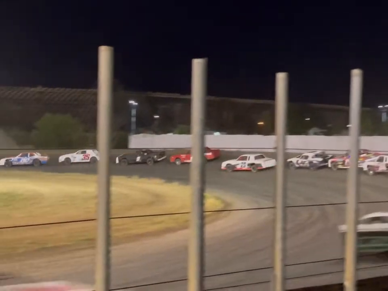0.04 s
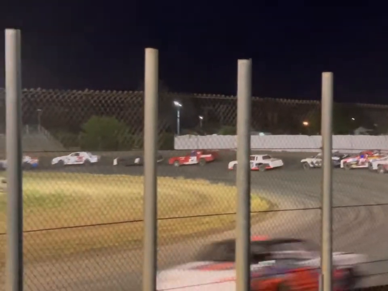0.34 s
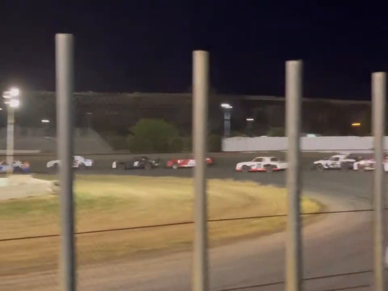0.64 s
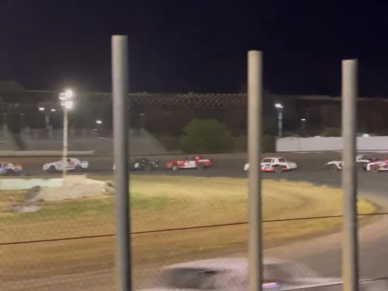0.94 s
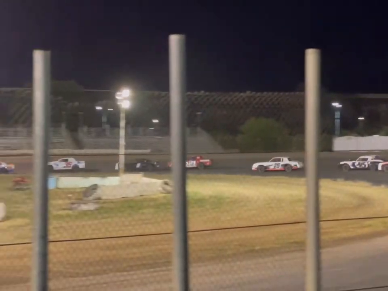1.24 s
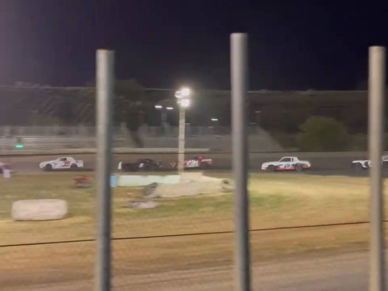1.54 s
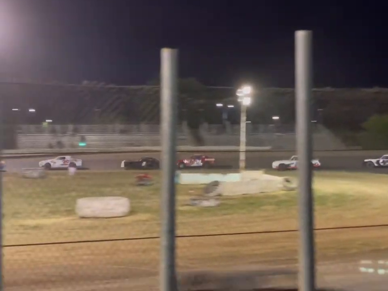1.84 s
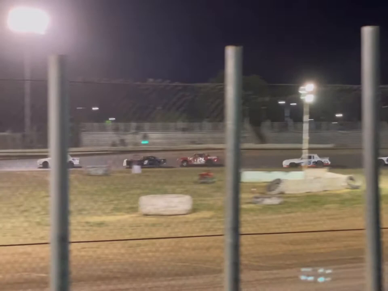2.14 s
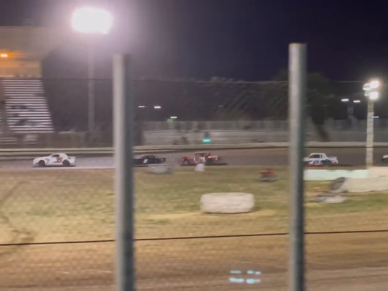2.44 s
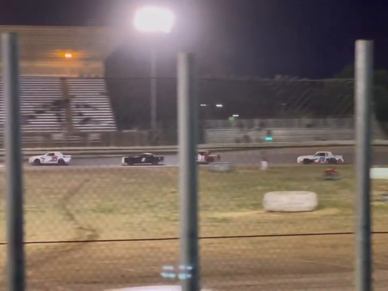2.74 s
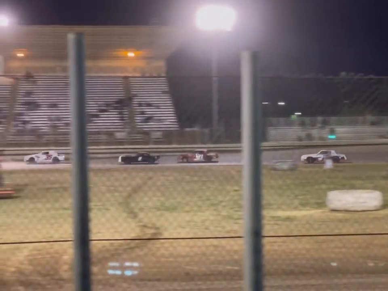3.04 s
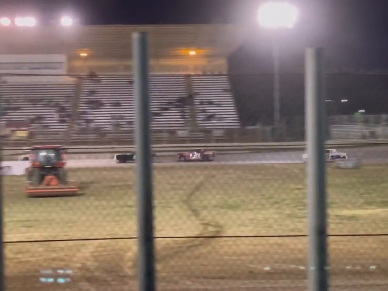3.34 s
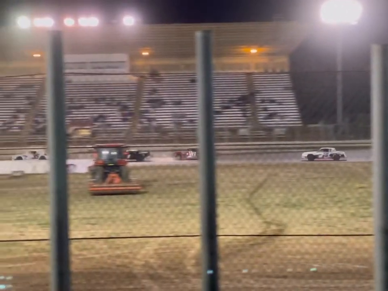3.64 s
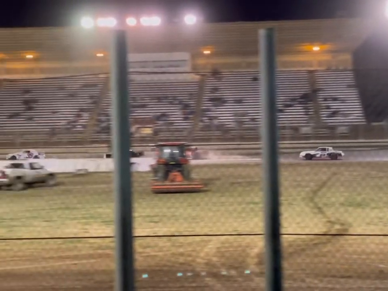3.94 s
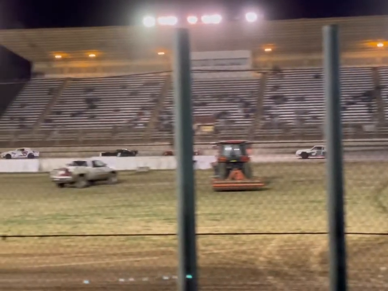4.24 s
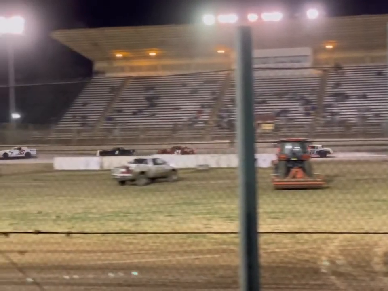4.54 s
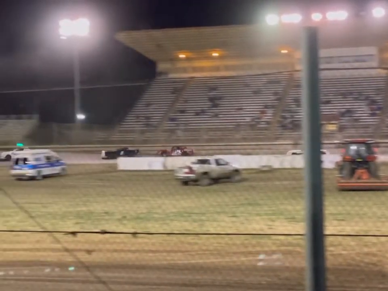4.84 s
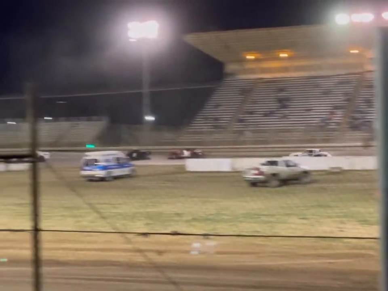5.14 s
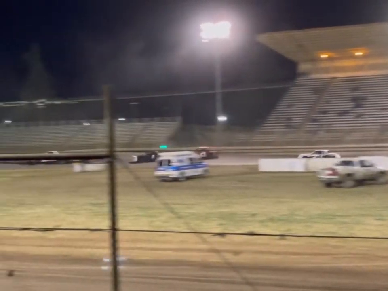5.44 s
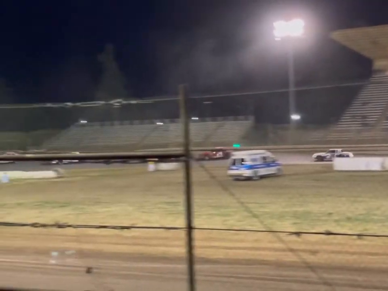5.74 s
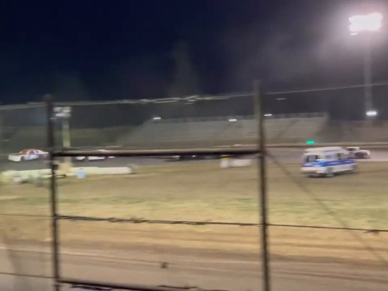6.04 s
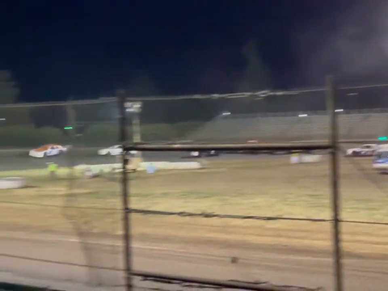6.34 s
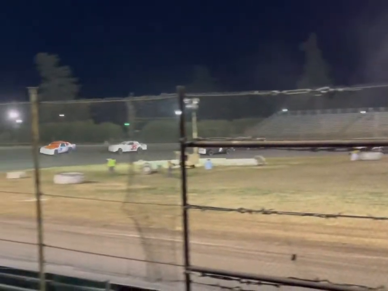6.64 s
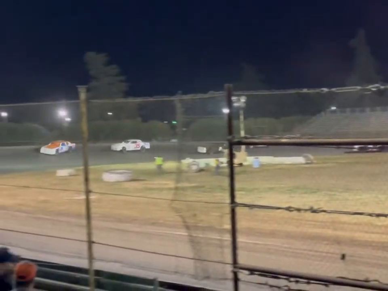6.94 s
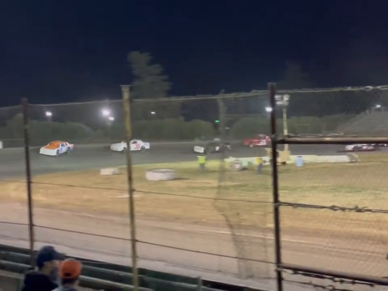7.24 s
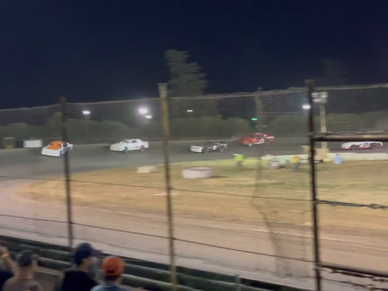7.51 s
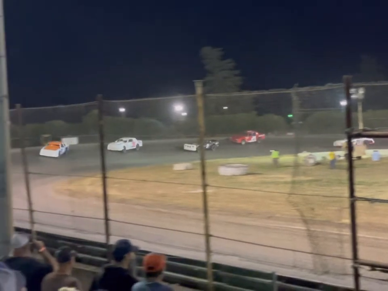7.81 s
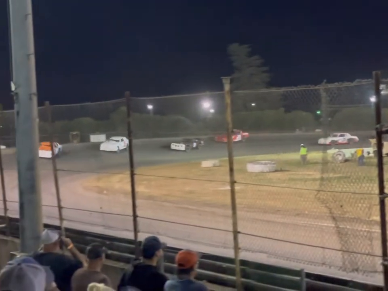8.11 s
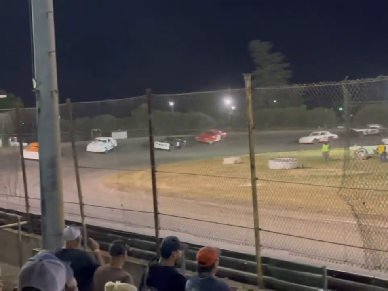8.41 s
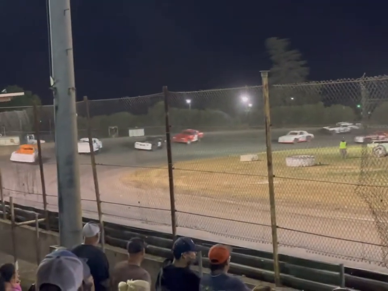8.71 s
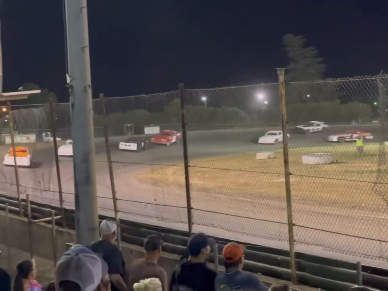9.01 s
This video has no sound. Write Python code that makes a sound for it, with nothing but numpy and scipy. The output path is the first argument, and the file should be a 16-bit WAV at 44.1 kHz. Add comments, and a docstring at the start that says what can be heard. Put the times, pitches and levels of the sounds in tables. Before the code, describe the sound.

A pack of race cars roars around a dirt oval, with loud droning engines and exhaust crackles, heard from the stands.

```python
"""V8 stock cars lap a dirt oval, heard from the grandstand.
First the last cars speed up past the fence, throwing up hissing dirt; one leaky exhaust pops, and unburnt
fuel cracks in it. From about 3 s the pack drones along the far straight, its firing pulses blurred into a
roar by echoes from the stands. Single engines hum above it, and two more exhausts pop from 5 to 7 s.
Then the pack comes round the turn towards the listener and grows louder again."""
import sys
import numpy as np
from scipy import signal
from scipy.fft import rfft, irfft, next_fast_len
from scipy.io import wavfile
from scipy.ndimage import uniform_filter1d

SR = 44100
rng = np.random.default_rng(int(sys.argv[2]) if len(sys.argv) > 2 else 0)


def unload_audio(sound):
    """Save the sound as a 16-bit wav file, at the path given as the first command line argument."""
    columns = np.transpose(np.atleast_2d(sound))
    # keep every value between -1 and 1, then stretch to whole-number steps
    steps = np.round(np.clip(columns, -1, 1) * 32767)
    wavfile.write(sys.argv[1], SR, steps.astype(np.int16))


N = 408807
TIME = np.arange(N) / SR

# Stretches of engine sound that hum and rasp: t/s, engine cycle rate/Hz (8 firings a cycle), level/dB
NEAR_RUN = [(0.0, 32.68, -14), (0.15, 33.93, -15.5), (0.3, 34.08, -15.5), (0.55, 35.24, -26)]
FIRST_RUN = [(0.2, 33.73, -20), (0.5, 34.94, -14.5), (0.8, 35.7, -15), (1.2, 36.95, -15.5),
             (1.55, 38.0, -21), (1.9, 39.83, -19.5), (2.3, 41.55, -23), (2.6, 41.84, -24.5)]
CRACKLER_RUN = [(0.6, 30.1, -27), (0.85, 31.5, -20.5), (1.1, 33.95, -19), (1.4, 35.63, -15),
                (1.6, 36.04, -14), (1.8, 36.4, -16), (2.0, 37.67, -23), (2.2, 40, -21.5), (2.5, 41.34, -31)]
SPRINTER_RUN = [(3.0, 44.22, -25), (3.25, 44.8, -32), (3.6, 45.98, -29), (4.05, 47.2, -24.5),
                (4.3, 46.43, -36), (4.6, 47.3, -27), (4.85, 47.56, -27.5), (5.05, 46.56, -28.5),
                (5.5, 48.12, -23.5), (5.7, 48.3, -26.5), (5.9, 49.76, -41)]
LEADER_RUN = [(5.6, 35.45, -34), (6.0, 36.7, -29), (6.25, 37.45, -24.5), (6.8, 38.05, -30.5),
              (7.3, 39.35, -24.5), (7.65, 40.55, -29.5), (7.9, 40.75, -22), (8.2, 42.0, -22.5),
              (8.5, 42.7, -23.5), (8.9, 43.7, -21.5), (9.27, 44.6, -24.5)]


def gain_of(db):
    """Turns decibels into a factor to multiply by."""
    return 10 ** (np.asarray(db) / 20)


def evened(x):
    """Scales a signal to an average strength (rms) of 1."""
    return x / np.sqrt(np.mean(x ** 2) + 1e-20)


def read(points, hz):
    """Looks up a table between its rows, on a log-frequency axis."""
    f, value = np.transpose(points)
    return np.interp(np.log(hz + 1), np.log(f + 1), value)


def filtered(x, response):
    """Filters x by a gain given as a function of frequency."""
    size = next_fast_len(len(x) + 2048)
    return irfft(rfft(x, size) * response(np.fft.rfftfreq(size, 1 / SR)), size)[:len(x)]


def wander(t, per_s):
    """A smooth random wobble of size about 1, with per_s new values a second."""
    knots = signal.resample_poly(rng.standard_normal(800), 8, 1)
    return np.interp(t * per_s * 8, np.arange(len(knots)), knots)


def humps(rows, t=TIME):
    """Level in dB of smooth swells or dips."""
    return sum(db * np.cos(np.pi * np.clip((t - middle) / length, -.5, .5)) ** 2
               for middle, length, db in rows)


def snaps(rows, colour, level_db, decay_s, scatter):
    """Each snap is a sudden jump in pressure with a short puff of noise behind it."""
    out, t = np.zeros(N), np.arange(512) / SR
    for s, db, treble_db in rows:
        snap = scatter * rng.standard_normal(len(t)) * np.exp(-t / decay_s) + (t == 0)
        snap = filtered(np.pad(snap, 64),
                        lambda f: gain_of(read(colour, f) + treble_db * np.clip(f / 6000 - .6, 0, 1)))
        part = out[round(s * SR) - 64:][:len(snap)]
        part += gain_of(db + level_db) * snap[:len(part)] / abs(snap).max()
    return out


def seat_ticks():
    """Faint, bright ticks near the seats."""
    # t/s, relative peak/dB, extra treble/dB
    ticks = [(4.996, -38, 12), (5.01, -38, 4), (5.354, -34, -5), (6.3212, -36, 0), (7.3502, -33, -3),
             (7.646, -29, -7)]
    # tone of a tick: f/Hz, level/dB
    colour = [(2000, -21), (5000, -10), (7200, 10), (10000, -2), (14000, -38)]
    return snaps(ticks, colour, level_db=5.0, decay_s=.002, scatter=0.71)


def stands(x):
    """Echoes off the stands, treble dying first; the cars move, so three sets of paths take turns."""
    # f/Hz, time to fade by 60 dB/s
    echo_times = [(100, 2.6), (500, 0.9), (2000, 0.99), (8000, 0.44)]
    echoes = rng.standard_normal((3, SR)) * (rng.random((3, SR)) < 2000 / SR)  # about 2000 a second
    hz, t, spectrum = signal.stft(echoes, SR, nperseg=256)
    decay = gain_of(-60 * t / read(echo_times, hz)[:, None])
    tails = signal.istft(spectrum * decay, SR, nperseg=256)[1]
    turn = 2 * np.pi * (.4 * TIME + np.arange(3)[:, None] / 3)
    return signal.oaconvolve(x * np.cos(turn), tails, axes=1)[:, :N].sum(0)


def firings(cycle_hz, uneven, misfire):
    """One pulse per firing, the eight cylinders unequal; the revs climb, sag and wobble."""
    stroke = np.arange(int(9 * cycle_hz * N / SR))
    t = stroke / (8 * cycle_hz)
    revs = .07 * np.sin(2 * np.pi * (t / 7 + rng.random())) + .015 * wander(t, 1.6) + .006 * wander(t, 12)
    at_sample = np.cumsum(SR / (8 * cycle_hz * (1 + revs))).astype(int)
    cylinder = evened(signal.detrend(rng.standard_normal(8), type="constant"))
    chance = rng.standard_normal(6000)
    force = (.35 + uneven * cylinder[stroke % 8] + misfire * chance[stroke]) * gain_of(2 * wander(t, 1.5))
    return np.bincount(at_sample, force, N)[:N]


def throttle(rise_s=0.11, cut_s=0.086):
    """Bursts of throttle with the pipes pointing this way: each builds, holds and stops."""
    # foot down/s, foot up/s, relative level/dB
    bursts = [(2.976, 3.29, 4), (4.5, 4.802, 1), (5.25, 5.687, 5.5), (6.027, 6.4, 4), (6.47, 6.625, 5),
              (7.098, 7.453, 2), (7.793, 8.137, 4), (8.85, 9.2, 1)]
    return sum(db * np.clip((TIME - down) / rise_s, 0, 1) * np.clip(1 - (TIME - up) / cut_s, 0, 1)
               for down, up, db in bursts)


def pack_gain(db, closeness_share, burst_share):
    """Loudness of one band of the pack's sound, following distance and throttle."""
    # the pack leaves the fence, runs the far straight and returns: t/s, relative level/dB
    closeness = [(0, -5.5), (.8, 0), (1.85, -1), (2.75, -6), (4.2, -10.5), (7, -10.5), (7.6, -7),
                 (8.55, -6.5), (8.95, -4.5), (9.27, -3.5)]
    closeness_db = np.interp(TIME, *np.transpose(closeness))
    return gain_of(db + closeness_share * closeness_db + burst_share * throttle())


def passing(nearest_s, crossing_s, db, falloff_db):
    """Loudness of something that goes by in a straight line."""
    return gain_of(db - falloff_db * np.log10(np.hypot(1, (TIME - nearest_s) / crossing_s)))


def roar_band(x, lo_hz, hi_hz):
    """One band of the exhaust roar, held steady: so many engines together keep an even level."""
    # tone of the roar: f/Hz, level/dB
    colour = [(25, -32), (39, -31), (50, -3.5), (72, -0.5), (108, -5.5), (152, -8.5), (195, 1), (235, 3),
              (340, -6), (460, -12.5), (750, -11.5), (1050, -17.5), (1500, -25.5), (2900, -25.5),
              (5500, -38.5), (10000, -38.5)]
    band = filtered(x, lambda f: gain_of(read(colour, f))
                    / np.sqrt((1 + (f / hi_hz) ** 12) * (1 + (lo_hz / (f + 1)) ** 12)))
    return band / np.sqrt(abs(uniform_filter1d(band ** 2, size=SR // 4)) + 1e-20)


def dirt_spray(gas):
    """Dirt is thrown up unevenly and hisses; a little exhaust noise is mixed in."""
    # tone of the hiss: f/Hz, level/dB
    colour = [(6000, -14), (8000, 3.5), (10000, 5.5), (12000, 1), (14000, 0.5), (15500, -9)]
    spatter = gain_of(wander(TIME, per_s=7))
    hiss = filtered(.3 * gas + rng.standard_normal(N), lambda f: gain_of(read(colour, f)) * (f > 5000))
    return evened(hiss) * spatter


def pack(puff_s=0.00077):
    """Ten engines at once: firing pulses, mostly heard as echoes, with puffs of gas and flying dirt."""
    # bands from low to high: base level/dB, share of closeness, share of throttle
    rumble = (-33, 0.027, -0.18)
    boom = (-23, 0.055, .05)
    bark = (-24, 0.5, 0.37)
    buzz = (-28.5, 0.92, 0.75)
    fizz = (-80, .68, .2)
    # the last cars pass the fence: nearest at t/s, time to drive their distance from the seats/s,
    # level/dB, loss per tenfold distance/dB
    rumble_pass = (0, 0.9, -21, 37)
    boom_pass = (-0.65, 0.5, -18.5, 28.5)
    spray_pass = (1.39, 0.75, -39, 46.5)
    # the boom swells and dips as engines fall in and out of step: middle/s, length/s, gain/dB
    swells = [(.12, 0.7, 2), (1.75, 1, 2), (2.45, 0.21, -4.5), (2.62, 0.17, -7), (3.12, 0.14, 2),
              (4.87, 0.87, 3.5), (5.36, 0.2, 6), (6.15, 0.5, 1), (7.9, 0.11, 3.5), (8.26, 0.13, 4),
              (8.8, 0.86, -0.5)]
    pulses = evened(sum(firings(hz, uneven=1.39, misfire=0.82) for hz in np.linspace(36, 51, num=10)))
    puff_power = signal.lfilter([1], [1, -np.exp(-1 / (puff_s * SR))], abs(pulses))
    gas = evened(np.sqrt(puff_power) * rng.standard_normal(N))
    echoes = evened(stands(pulses))
    low = echoes + 0.31 * pulses + .5 * gas
    high = echoes + 0.27 * pulses + gas
    flutter = gain_of(.5 * wander(TIME, per_s=17))  # moving air makes the treble flutter
    boom_gain = np.hypot(pack_gain(*boom), passing(*boom_pass)) * gain_of(humps(swells))
    return (roar_band(low, 20, 145) * np.hypot(pack_gain(*rumble), passing(*rumble_pass))
            + roar_band(low, 124, 398) * boom_gain
            + roar_band(low, 392, 1500) * pack_gain(*bark)
            + roar_band(high, 1323, 7620) * pack_gain(*buzz) * flutter
            + dirt_spray(gas) * np.hypot(pack_gain(*fizz), passing(*spray_pass)) * flutter)


def pipe(x, centre_hz, width):
    """An open exhaust pipe favours a broad range of pitches around centre_hz."""
    return filtered(x, lambda f: np.exp(-(np.log((f + 1) / centre_hz) / width) ** 2 / 2))


def rasp(run, level_db, sharpness, centre_hz, width=0.8):
    """Gas tears out of a pipe at each firing; much of it repeats every cycle, giving overtones."""
    s, cycle_hz, run_db = np.transpose(run)
    cycles = np.cumsum(np.interp(TIME, s, cycle_hz)) / SR
    puffs = np.exp(-sharpness * (cycles * 8 % 1))
    repeating = np.interp(cycles % 1, np.linspace(0, 1, 1200), rng.standard_normal(1200))
    gas = pipe(puffs * (repeating + .5 * rng.standard_normal(N)), centre_hz, width)
    return evened(gas) * gain_of(level_db + np.interp(TIME, s, run_db, left=-120, right=-120))


def exhaust_rasps():
    """Five stretches of engine sound have a rough edge of rushing gas."""
    return (rasp(NEAR_RUN, level_db=-19.5, sharpness=0.92, centre_hz=2320)
            + rasp(FIRST_RUN, level_db=-17.5, sharpness=1.0, centre_hz=2900, width=0.62)
            + rasp(CRACKLER_RUN, level_db=-14, sharpness=3.2, centre_hz=1700)
            + rasp(LEADER_RUN, level_db=-14.5, sharpness=2.0, centre_hz=1270)
            + rasp(SPRINTER_RUN, level_db=-25, sharpness=2.5, centre_hz=1800))


def pops(run, level_db, centre_hz, decay_s, width=0.45):
    """One sharp puff in every engine cycle, no two equally strong."""
    s, cycle_hz, run_db = np.transpose(run)
    speed = np.interp(TIME, s, cycle_hz)
    cycles = np.cumsum(speed * (TIME >= s[0])) / SR
    force = gain_of(2 * rng.standard_normal(500))[cycles.astype(int)]
    puffs = force * np.exp(-(cycles % 1) / speed / decay_s) * (cycles > 0) * rng.standard_normal(N)
    loudness = gain_of(level_db + np.interp(TIME, s, run_db, left=-120, right=-120))
    return pipe(puffs, centre_hz, width) * loudness


def exhaust_leaks():
    """Three leaking exhausts pop, one after another."""
    # t/s, engine cycle rate/Hz, relative level/dB
    crackler = [(1.3212, 35.9, -12), (1.6, 35.97, 0), (1.75, 36.3, 0), (1.85, 36.8, 0), (1.9, 37.15, -2),
                (2.06, 37.6, -12)]
    sprinter = [(5.35, 47.7, -8), (5.5, 48, 0), (5.68, 48.35, 0), (5.76, 48.7, -8)]
    blarer = [(6.02, 45.8, -6), (6.15, 46.5, 0), (6.35, 46, 0), (6.65, 45.2, -8)]
    return (pops(crackler, level_db=-9.5, centre_hz=3700, decay_s=0.00098)
            + pops(sprinter, level_db=-15.5, centre_hz=1980, decay_s=0.0013)
            + pops(blarer, level_db=-16, centre_hz=1580, decay_s=0.0027, width=0.68))


def fuel_cracks():
    """Unburnt fuel goes off in the crackling car's exhaust."""
    # t/s, relative peak/dB, extra treble/dB
    cracks = [(1.544, -8.5, 2), (1.655, -10, 0), (1.7103, -8.5, -7), (1.7655, -14, -2), (1.793, -9, -5),
              (1.8203, -8, 4), (1.8477, -9, 1), (1.8747, -7, 2), (1.9016, -10, 0), (1.9285, -7, 2),
              (2.0087, -11, 4)]
    # tone of a crack: f/Hz, level/dB
    colour = [(500, -14), (1500, -7), (3000, 17.5), (4800, 11), (6500, -2.5), (9000, -5), (13500, -3),
              (16000, -10)]
    return snaps(cracks, colour, level_db=4.0, decay_s=0.00063, scatter=0.18)


def car(run, tones, weak_db, fade_db, flares=(), jitter=0.00184, fades_per_s=7, knee_hz=635,
        path_radians=0.48):
    """An engine hums at multiples of its cycle rate; each tone fades by itself as echo paths shift."""
    s, cycle_hz, level_db = np.transpose(run)
    step = 6  # work on every sixth sample, fill in the rest at the end
    t = np.arange(max(s[0], 0), min(s[-1], N / SR), step / SR)
    speed = np.interp(t, s, cycle_hz) * (1 + jitter * wander(t, 14))
    cycles = np.cumsum(speed) * step / SR
    strong = {round(k): db for k, db in tones}
    sound = 0
    for k in range(2, 62):
        # unlisted tones start from weak_db and fall away above knee_hz
        db = strong.get(k, weak_db - 10 * np.log10(1 + (k * cycle_hz.mean() / knee_hz) ** 3))
        db = db + humps([row[1:] for row in flares if round(row[0]) == k], t)
        fade = .8 if k in strong else 1  # the leading tones hold firmer
        phase = 2 * np.pi * rng.random() + fade * path_radians * wander(t, fades_per_s)
        strength = gain_of(db + fade * fade_db * wander(t, fades_per_s))
        sound = sound + strength * np.cos(2 * np.pi * k * cycles + phase)
    sound = signal.resample_poly(evened(sound) * gain_of(np.interp(t, s, level_db)), step, 1)
    return np.interp(TIME, t[0] + np.arange(len(sound)) / SR, sound, left=0, right=0)


def single_cars():
    """Twelve stretches of engine hum; a car's tone changes as it moves round the track."""
    # t/s, engine cycle rate/Hz, level/dB
    droner_run = [(2.25, 40.5, -34), (2.48, 41.2, -28), (2.56, 41.2, -17), (2.75, 40.8, -18),
                  (2.97, 40.1, -21), (3.2, 41.35, -22), (3.5, 40.15, -24.5), (3.85, 39.15, -27),
                  (4.05, 39.5, -26), (4.28, 38.2, -27), (4.45, 38.85, -26.5), (4.75, 38.35, -25.5),
                  (5.0, 36.9, -28), (5.22, 35.25, -27), (5.5, 36.3, -36)]
    far_run = [(2.35, 41.7, -26), (2.6, 41.9, -39), (3.0, 40.45, -33), (3.5, 37.76, -39), (4.0, 37.65, -36),
               (4.35, 37.28, -28.5), (4.7, 35.93, -34)]
    lifter_run = [(4.7, 44.3, -38), (4.9, 43.26, -29), (5.05, 41.2, -31), (5.25, 37.7, -25.5),
                  (5.4, 37, -41)]
    chaser_run = [(5.4, 39.0, -37), (5.8, 40.17, -23), (6.2, 42.34, -24), (6.6, 44.33, -25),
                  (6.85, 45.25, -36), (7.05, 45.1, -27.5), (7.45, 47.7, -27), (7.75, 47.34, -24),
                  (8.05, 48.6, -28), (8.3, 48.5, -25.5), (8.6, 49.45, -28), (9.27, 49.63, -25)]
    blarer_run = [(6.0, 45.84, -37), (6.15, 46.4, -23.5), (6.3, 46.3, -24.5), (6.42, 45.46, -32),
                  (6.55, 45.7, -32)]
    third_run = [(6.4, 39.8, -37), (6.8, 41.2, -41), (7.2, 42.15, -32), (7.8, 42.04, -44),
                 (8.05, 44.03, -46), (8.35, 44.07, -28.5), (8.6, 44.54, -34), (8.9, 43.45, -33)]
    fourth_run = [(8.0, 42, -45), (8.3, 43.7, -43), (8.62, 46.1, -27.5), (8.85, 46.67, -25),
                  (9.05, 47.1, -24.5), (9.27, 47.8, -27.5)]
    # tones that the exhaust brings out in each stretch: multiple of the cycle rate, relative level/dB
    near_tones = [(2, -3), (3, 1), (8, -2), (11, 0), (15, -13), (18, -14)]
    first_tones = [(2, -6), (3, -2.5), (5, 0.5), (6, -5.5), (8, -7), (9, -6.5), (11, -8.5), (13, -8),
                   (14, -10), (15, -10.5), (16, -15.5), (17, -11), (19, -7), (20, -10), (21, -12.5),
                   (25, -14.5)]
    crackler_tones = [(2, -3.5), (3, -3), (5, 1), (6, -1), (7, -3), (8, -1), (9, -3), (10, -3), (11, -4),
                      (13, -4), (15, -2.5), (16, -5), (20, -10), (26, -15), (28, -14), (34, -16)]
    droner_tones = [(2, -11), (5, 0), (6, -5), (8, -11), (9, -12), (11, -5.5), (15, -9.5), (19, -19),
                    (20, -18), (25, -21)]
    far_tones = [(2, -7), (5, 2), (11, -10.5), (12, -7), (13, -21), (15, -11), (22, -10.5)]
    sprinter_tones = [(5, -3.5), (7, -6), (10, -10.5), (20, -24), (22, -18.5), (23, -19), (28, -22),
                      (33, -23)]
    lifter_tones = [(3, -0.5), (14, -15), (33, -30)]
    leader_tones = [(5, 1.5), (6, -6), (10, -12), (13, -17), (14, -14), (15, -15), (20, -14), (24, -21),
                    (29, -18), (30, -19)]
    chaser_tones = [(3, -7), (5, 2.5), (9, -10), (11, -13), (13, -13), (15, -8), (16, -15), (20, -16),
                    (36, -25)]
    blarer_tones = [(4, -6.5), (7, 1.5), (12, -18), (25, -10), (27, -14), (29, -10), (30, -14), (35, -15),
                    (36, -26)]
    third_tones = [(21, -4), (24, -8), (25, -11), (28, 0), (29, -7), (34, -13), (37, -11), (46, -14)]
    fourth_tones = [(13, -1), (14, -6), (15, -6), (16, -6), (21, -1), (26, -3), (27, -3), (28, -5),
                    (38, -8)]
    # single engine tones that briefly swell or fade: multiple, middle/s, length/s, gain/dB
    near_flares = [(11, 0.063, 0.49, 6.5)]
    first_flares = [(5, 0.32, .7, -13), (13, 0.81, 0.33, 6), (21, 0.99, 1, 5), (2, 2.16, 0.23, 8),
                    (5, 2.1, 0.63, 6)]
    crackler_flares = [(10, 1.34, 0.49, 3.9), (15, 1.72, .4, 3.8), (5, 1.995, 0.45, 5.62)]
    droner_flares = [(11, 2.66, 0.83, -9), (15, 2.72, 1.3, -9.5), (6, 3.3, 1.1, -9), (11, 3.41, .4, 8)]
    chaser_flares = [(36, 8.97, .55, 15)]
    fourth_flares = [(38, 8.98, 0.49, 5.8), (14, 8.85, .35, 5)]
    return (car(NEAR_RUN, near_tones, flares=near_flares, weak_db=-14, fade_db=4, knee_hz=447)
            + car(FIRST_RUN, first_tones, flares=first_flares, weak_db=-20.5, fade_db=2.5, knee_hz=1010)
            + car(CRACKLER_RUN, crackler_tones, flares=crackler_flares, weak_db=-15.5, fade_db=3,
                  knee_hz=1048.6, jitter=0.0034, fades_per_s=10.93)
            + car(droner_run, droner_tones, flares=droner_flares, weak_db=-25, fade_db=3.5,
                  path_radians=0.6)
            + car(far_run, far_tones, weak_db=-16, fade_db=2, knee_hz=500)
            + car(SPRINTER_RUN, sprinter_tones, weak_db=-16.5, fade_db=2.5)
            + car(lifter_run, lifter_tones, weak_db=-16.5, fade_db=-0.5)
            + car(LEADER_RUN, leader_tones, weak_db=-16, fade_db=1.5)
            + car(chaser_run, chaser_tones, flares=chaser_flares, weak_db=-13.5, fade_db=3.5, jitter=.002)
            + car(blarer_run, blarer_tones, weak_db=-21, fade_db=2, knee_hz=1200)
            + car(third_run, third_tones, weak_db=-12, fade_db=3, knee_hz=850)
            + car(fourth_run, fourth_tones, flares=fourth_flares, weak_db=-11, fade_db=3,
                  knee_hz=1200, jitter=.0025, fades_per_s=12))


def microphones(echoing, direct):
    """Two microphones hear echoes partly unlike, direct sound alike; the midrange follows the cars."""
    # how alike the two sides are: f/Hz, likeness (1 = the same)
    likeness = [(100, 1), (220, 0.9), (400, 0.92), (650, 0.66), (1050, 0.63), (1500, 0.97), (2200, 1),
                (3200, 0.93), (5200, 0.85), (6000, 0.26), (8100, 0.52), (8400, 1), (9300, 0.99),
                (10000, 0.61), (12000, 0.46), (13000, 1)]
    # f/Hz, lead of the left side/radians
    left_lead = [(2700, 0), (3000, .5), (5250, .4), (5750, -1.5), (6700, -.75), (8300, -3.1), (9400, -3.2),
                 (10000, -4.1), (12800, -6.28)]
    # direction of the cars: t/s, lead of the left side in the midrange/radians
    bearing = [(0, 0.46), (1.5, -0.14), (3, -0.76), (5, -1.2), (9.3, -0.99)]
    frames = dict(fs=SR, nperseg=1024, noverlap=768)
    hz, t, spectrum = signal.stft(echoing, **frames)
    scrambled = spectrum * np.exp(2j * np.pi * rng.random(spectrum.shape)) * 1.87
    alike = np.clip(read(likeness, hz), 0, 1)[:, None]
    common = np.sqrt((1 + alike) / 2) * spectrum + signal.stft(direct, **frames)[2]
    apart = np.sqrt((1 - alike) / 2) * scrambled
    midrange = np.exp(-(np.log((hz + 1) / 760) / 0.68) ** 2)[:, None]
    swing = midrange * np.interp(t, *np.transpose(bearing))
    lean = gain_of(midrange * np.interp(t, [1.3, 2.5], [2.6, -.4]))  # louder on the left at first
    left = (common + apart) * lean * np.exp(.5j * swing)
    right = (common - apart) / lean * np.exp(-.5j * swing - 1j * read(left_lead, hz)[:, None])
    return signal.istft(np.array([left, right]), **frames)[1][:, :N]


def scene():
    """Single cars stand out of the roar of the pack; pops, cracks and ticks arrive directly."""
    echoing = single_cars() + exhaust_rasps() + pack()
    direct = exhaust_leaks() + fuel_cracks() + seat_ticks()
    return microphones(echoing, direct)


def record(dry):
    """Rounds off the highest peaks, then cuts the treble above 15750 Hz."""
    rounded = dry / (1 + (dry / .95) ** 8) ** (1 / 8)
    treble_cut = signal.firwin(511, 15750, window=("kaiser", 9), fs=SR)
    return signal.oaconvolve(rounded, treble_cut[None], "same")


dry = scene()
out = record(dry)
unload_audio(out)
```